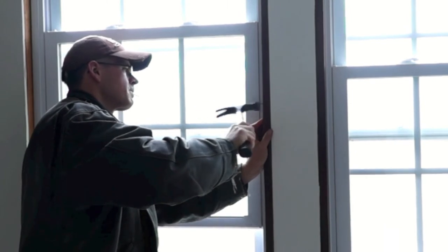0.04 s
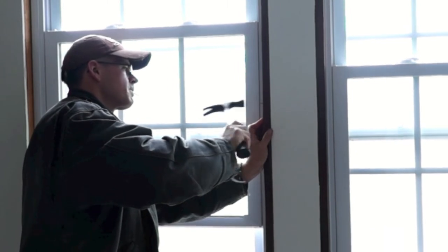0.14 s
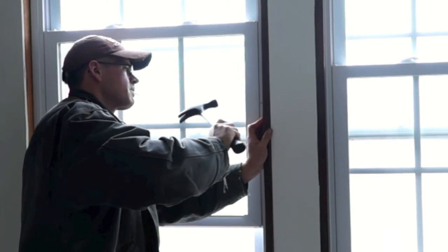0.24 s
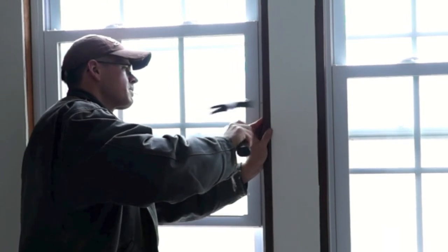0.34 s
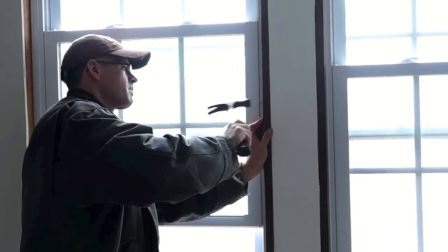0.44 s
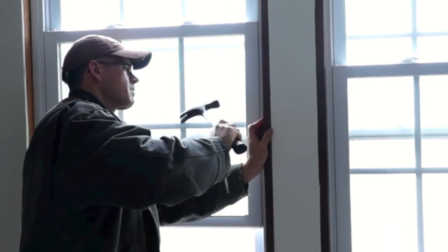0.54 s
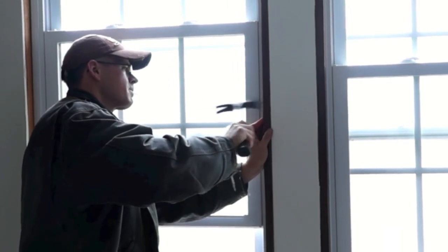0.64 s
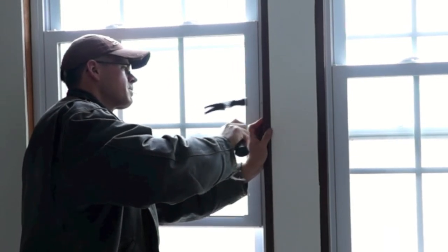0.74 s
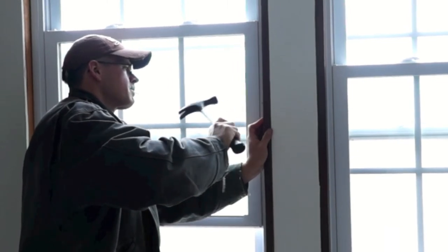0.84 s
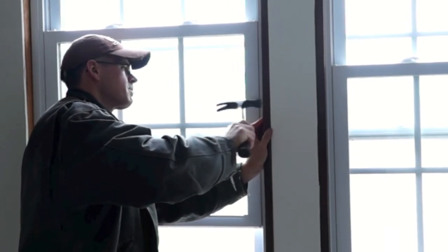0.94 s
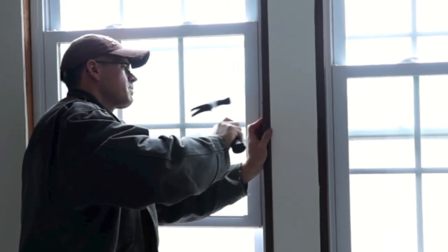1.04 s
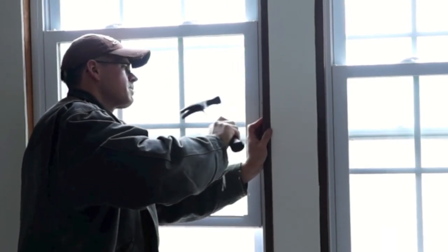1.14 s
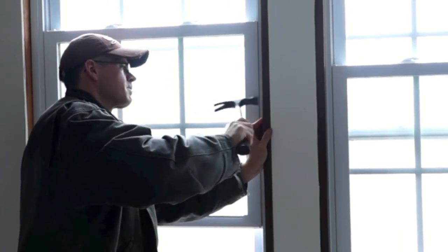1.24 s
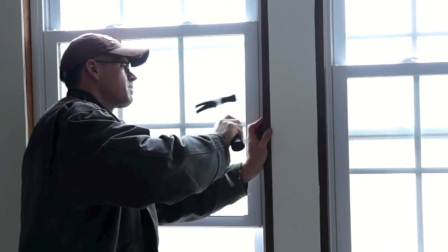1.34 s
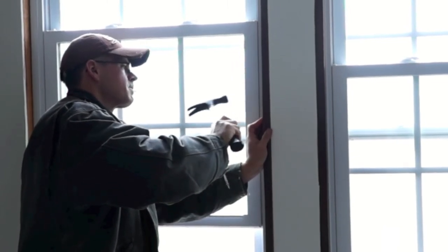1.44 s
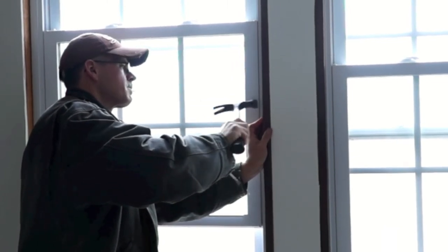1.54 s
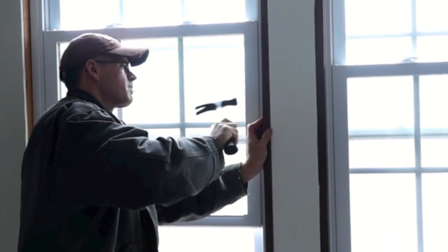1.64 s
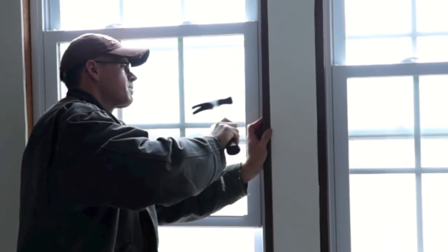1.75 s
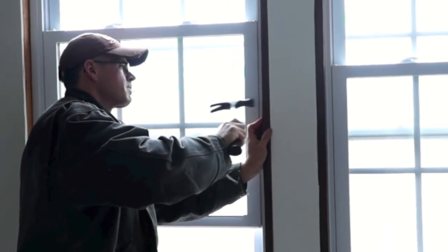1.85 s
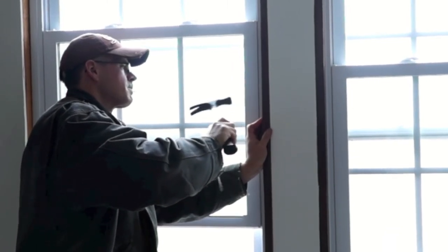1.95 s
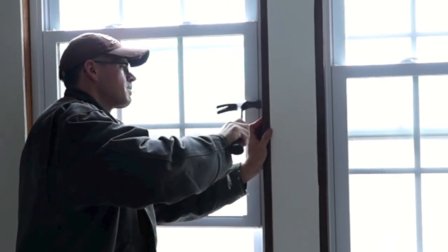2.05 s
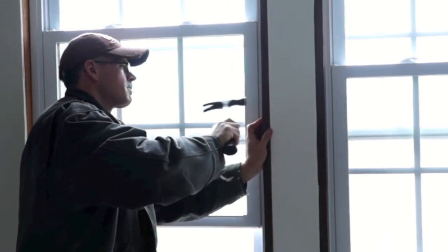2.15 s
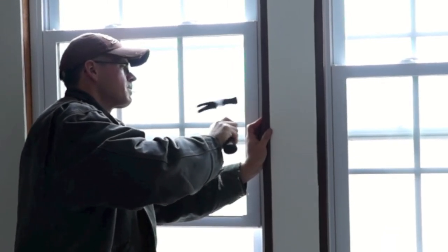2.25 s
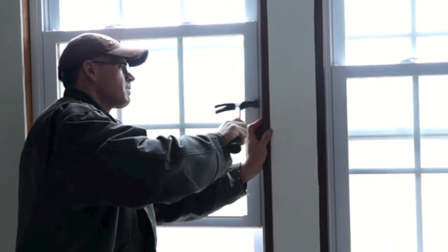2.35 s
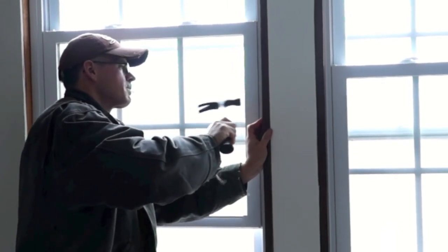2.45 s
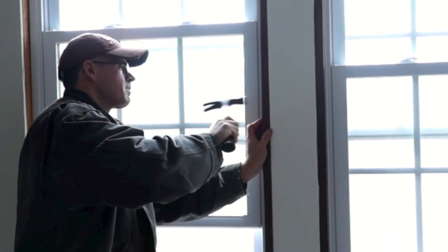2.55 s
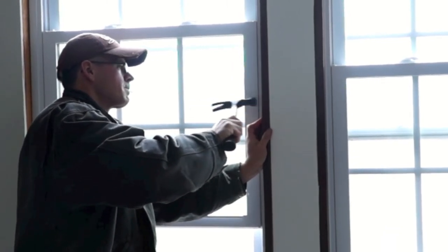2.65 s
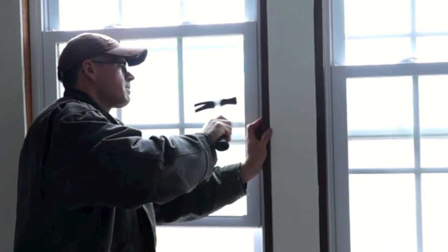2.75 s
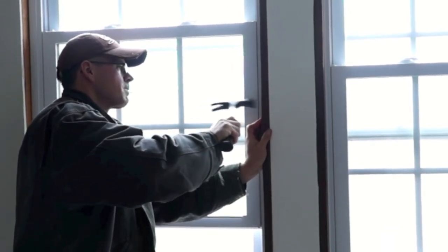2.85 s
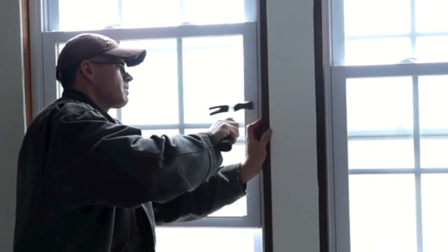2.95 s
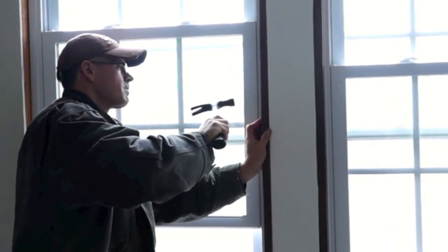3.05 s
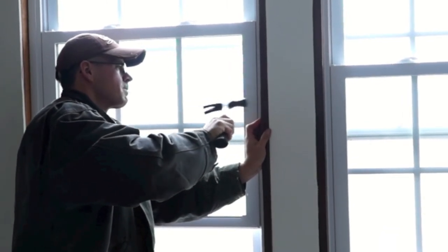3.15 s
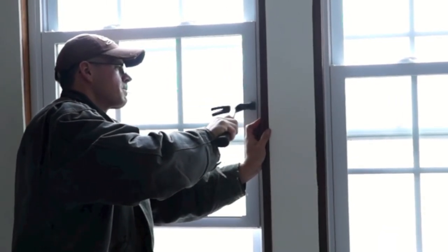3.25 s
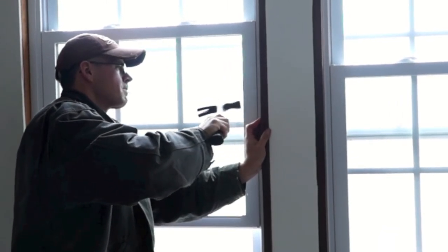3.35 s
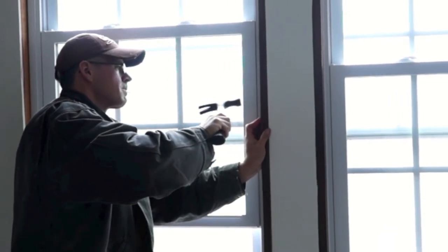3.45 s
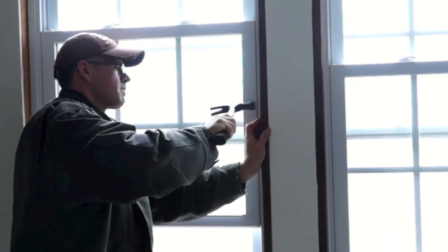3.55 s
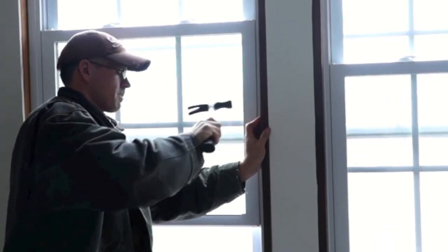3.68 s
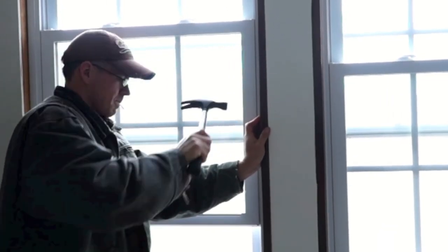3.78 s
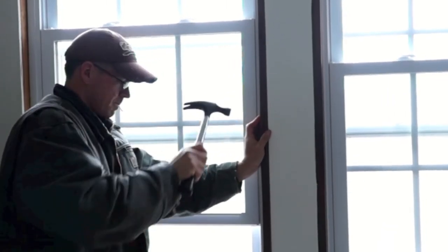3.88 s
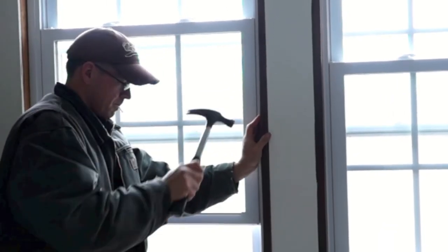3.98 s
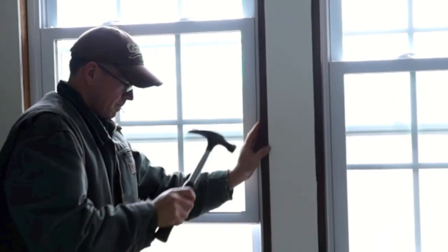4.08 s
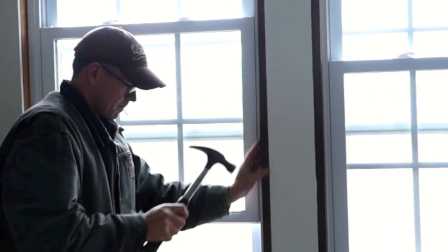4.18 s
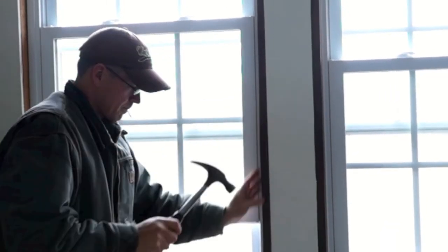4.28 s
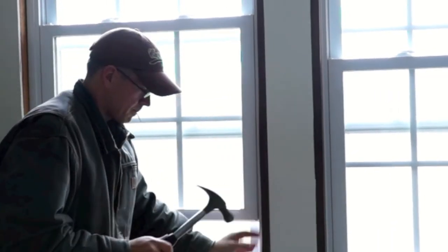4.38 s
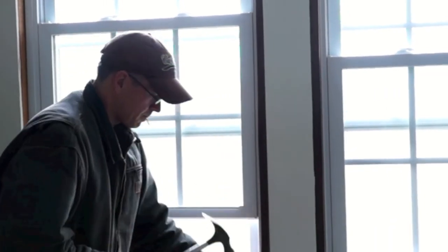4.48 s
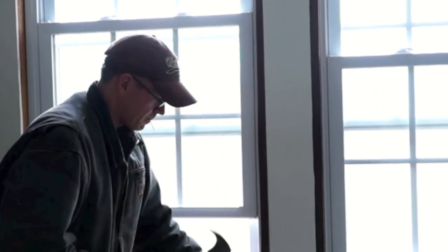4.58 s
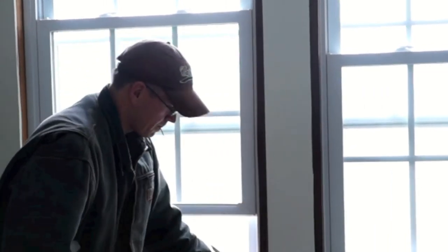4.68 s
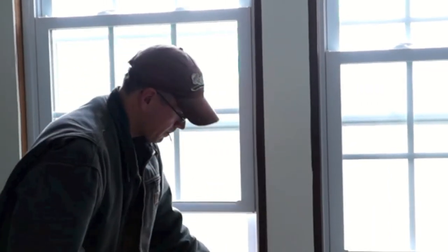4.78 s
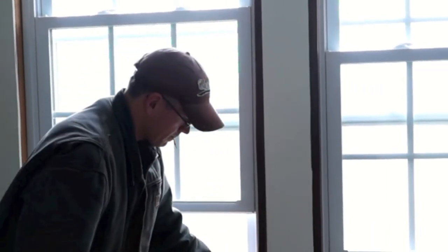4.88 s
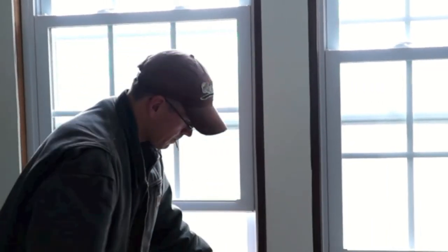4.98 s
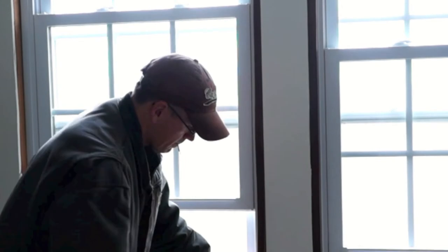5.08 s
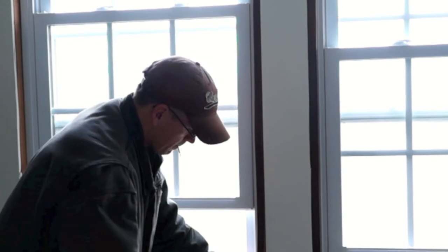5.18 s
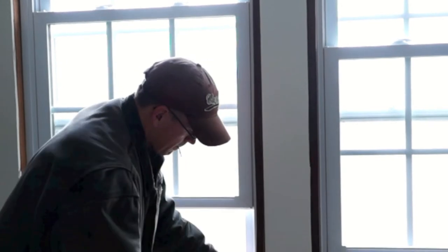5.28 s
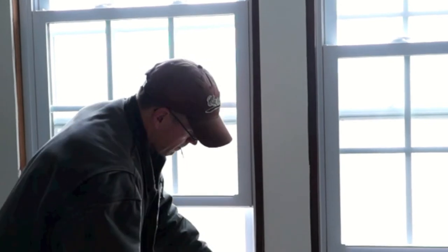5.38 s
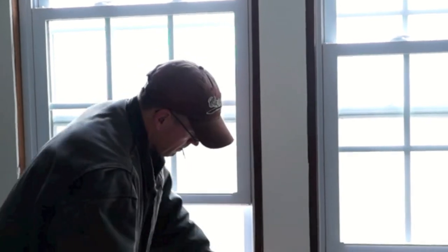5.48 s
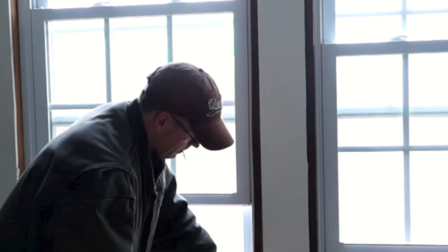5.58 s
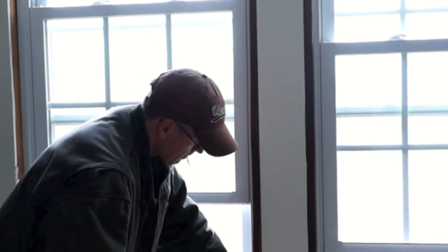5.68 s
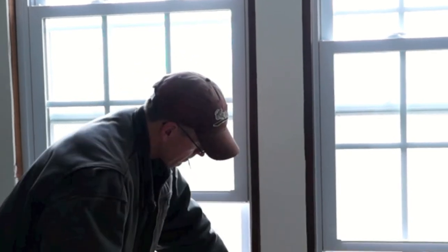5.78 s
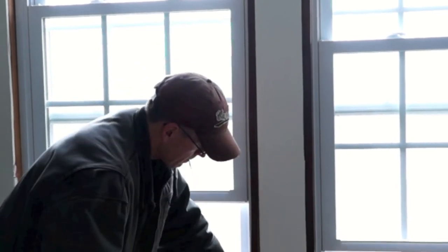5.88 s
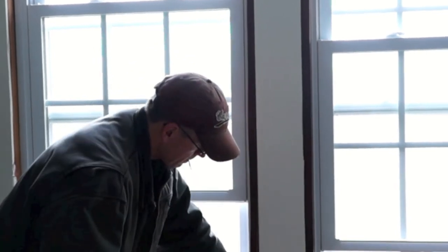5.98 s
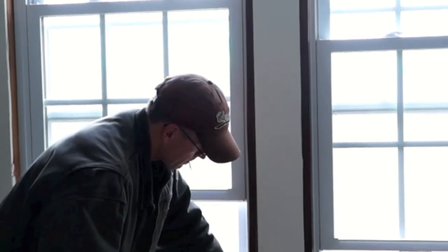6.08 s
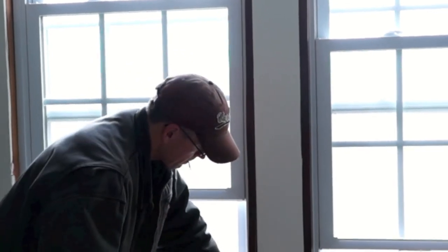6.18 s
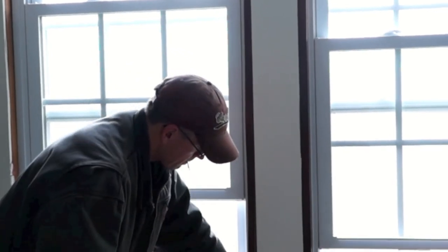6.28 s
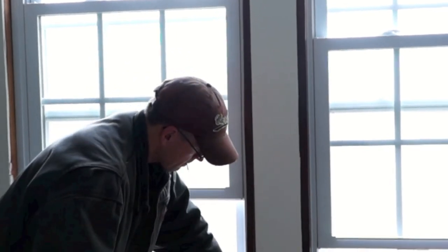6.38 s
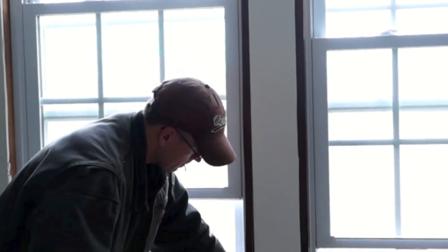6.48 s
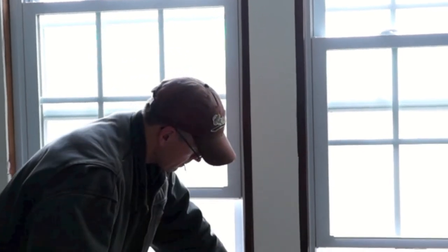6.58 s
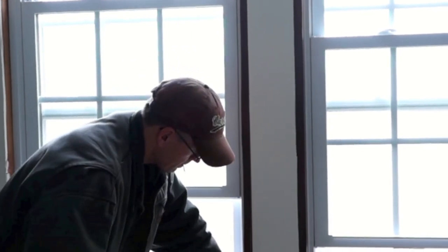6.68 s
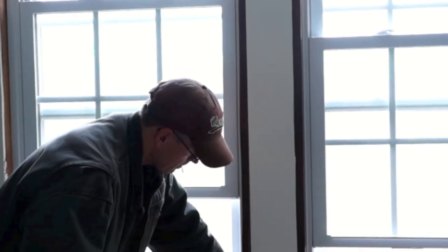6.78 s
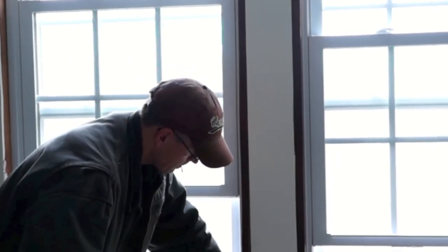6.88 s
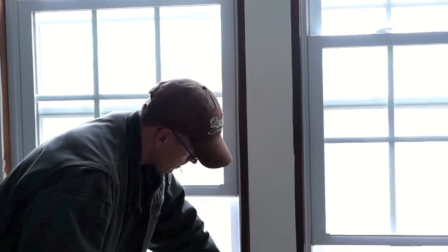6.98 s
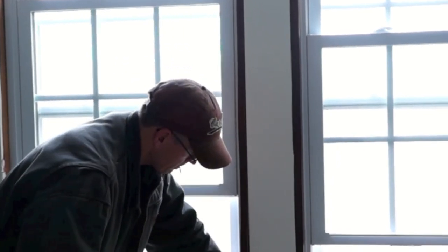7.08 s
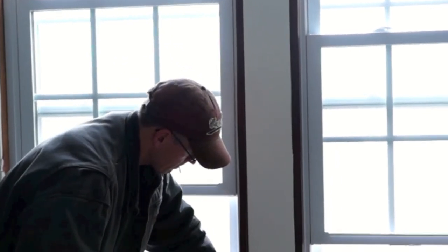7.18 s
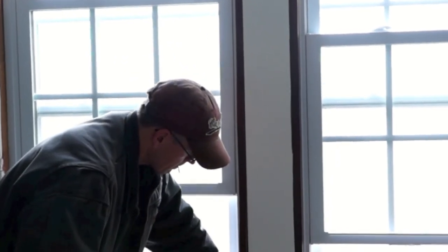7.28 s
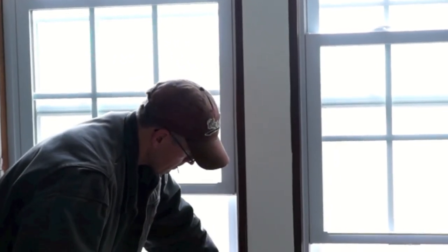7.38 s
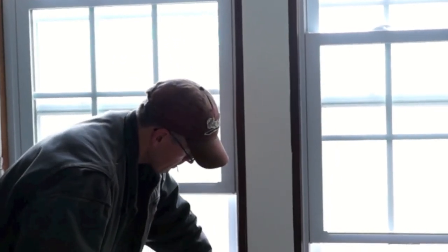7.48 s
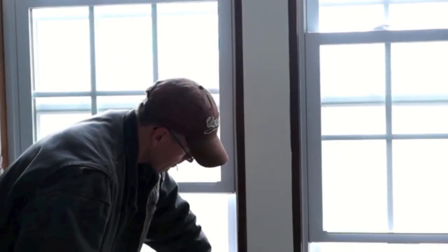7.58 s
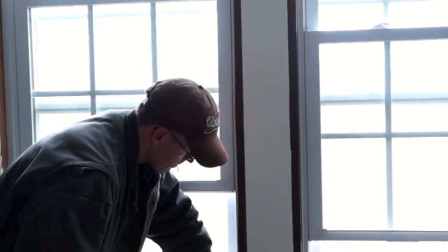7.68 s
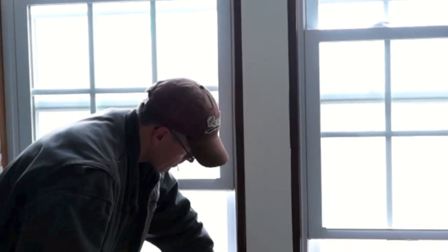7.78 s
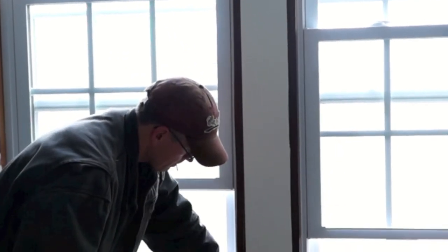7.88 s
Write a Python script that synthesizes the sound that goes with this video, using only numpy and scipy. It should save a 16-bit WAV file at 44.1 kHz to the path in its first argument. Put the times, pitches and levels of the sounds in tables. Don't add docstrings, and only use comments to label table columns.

```python
import sys
import numpy as np
from scipy import signal
from scipy.fft import rfft, irfft, next_fast_len
from scipy.io import wavfile
from scipy.ndimage import uniform_filter1d

SR = 44100
rng = np.random.default_rng(int(sys.argv[2]) if len(sys.argv) > 2 else 0)


def materialize(psi):
    bounded = np.clip(np.atleast_2d(psi).T, -1, 1)
    quanta = np.round(bounded * 32767).astype(np.int16)
    wavfile.write(sys.argv[1], SR, quanta)


def ratio_of_db(decibels):
    return 10 ** (np.asarray(decibels, float) / 20)


N = 349713
HZ = np.fft.rfftfreq(512, 1 / SR)

BLOW_S = [.0932, .4009, .6839, .9683, 1.2571, 1.5456, 1.8225, 2.0848, 2.3529, 2.6372, 2.911, 3.2463, 3.532]
# peak in dB, dB lost by a glancing face, then jamb, nail shank and trim in dB.
BLOWS = [(-18.5, 0, -18, -1, -5), (-18, -0.5, -17, -6.5, -7), (-18, -0.3, -13, -9, -10),
         (-17.5, -1.5, -13, -31, -9), (-17.5, -2, -10.5, -25, -1), (-17.5, -1.5, -11, -19, 5.5),
         (-18, -1, -10, -19.5, 5.5), (-18, -1.5, -12, -30, 5), (-18, -2, -9.5, -26, 5.5),
         (-17.5, -2.5, -5.5, -24, 0.5), (-17, -6, -2.5, -8, -8.5), (-19.5, -14, -0.5, -27, 2.5),
         (-17, -3, -3.5, -7, -3)]


def evened(x):
    return x / np.sqrt(np.mean(x ** 2) + 1e-20)


def read(points, hz):
    f, value = np.transpose(points)
    return np.interp(np.log(hz + 1), np.log(f + 1), value)


def above(x, hz):
    return signal.sosfilt(signal.butter(2, hz, "high", fs=SR, output="sos"), x)


def add(mix, s, sound):
    at = round(s * SR)
    part = mix[..., max(at, 0):max(at + sound.shape[-1], 0)]
    part += sound[..., max(-at, 0):][..., :part.shape[-1]]


def pulse(spectrum, size=4096):
    hz = abs(np.fft.fftfreq(size, 1 / SR))
    log = np.log(ratio_of_db(np.maximum(read(spectrum, hz), -90)))
    h = np.fft.ifft(np.exp(log - 1j * signal.hilbert(log).imag)).real[:size // 2]
    return h / np.linalg.norm(h)


def ring(modes, rise_s, size=22050, chance=1, spread=0.025, longest_s=0.67):
    t, port = np.arange(size) / SR, np.array([[1], [-1]])
    x = 0
    for k, (hz, db, t60) in enumerate(modes):
        start, apart, lean = rng.uniform(-1.066, 1, 3)
        turns = hz * t + chance * start + spread * apart * port
        level_db = db - 60 * t / min(t60, longest_s) + 15 * spread * lean * port
        x = x + (-1) ** k * ratio_of_db(level_db) * np.sin(2 * np.pi * turns)
    x = x * (1 - np.exp(-t / rise_s)) ** 2
    return x / abs(x).max()


def noise(gain, same, size, patchy_db):
    a, b, c, d, patches = rng.standard_normal((size // 128 + 5, 257, 5), dtype=np.float32).T
    patches = evened(uniform_filter1d(uniform_filter1d(patches, 12, axis=0), 14, axis=1))
    like = np.clip(read(same, HZ), -1, 1)[:, None]
    left = a + 1j * b
    right = like * left + np.sqrt(1 - like ** 2) * (c + 1j * d)
    z = np.array([left, right]) * gain * ratio_of_db(patchy_db * patches)
    return signal.istft(z, nperseg=512, noverlap=384)[1][:, :size] / np.sqrt(342)


def tightness(s):
    # time in seconds, how far the nail is seated (0-1).
    seating = [(.1, 0.18), (1.26, 0.3), (1.55, 0.74), (2.1, 0.98), (3.6, 0.97)]
    return np.clip(np.interp(s, *np.transpose(seating)), 0, 1)


def all_blows():
    times = [BLOW_S[0] - .29, *BLOW_S]
    return [(s, row[0], row[1]) for s, row in zip(times, BLOWS[:1] + BLOWS)]


def hammer():
    # pitch in Hz, level in dB per Hz.
    proud_knock = [(82, -54), (140, -13.5), (173, -8.5), (247, -8), (279, -2.5), (436, -19), (680, -6),
                   (1170, -20.5), (1520, -21), (1730, -14), (2750, -20.5), (5000, -34), (6500, -59),
                   (11000, -120)]
    # pitch in Hz, level in dB per Hz.
    gripped_knock = [(80, -32), (140, -15), (283, -0.5), (420, -2), (620, -10), (760, -6), (930, -6.5),
                     (1080, -13), (1340, -9.5), (1500, -15.5), (1800, -11), (2500, -18.5), (3300, -21.5),
                     (5000, -31), (9000, -58.5)]
    # pitch in Hz, level in dB per Hz.
    proud_tick = [(2120, -25), (3500, -9), (3900, -3.5), (7300, -2.5), (7880, 1.5), (12900, -8.5),
                  (16100, -15), (16500, -38)]
    # pitch in Hz, level in dB per Hz.
    flush_tick = [(2120, -39), (3500, -17.5), (3900, -3), (5620, 0), (8780, -0.5), (14300, -12),
                  (15700, -31), (16500, -69.5)]
    # delay in seconds, level in dB.
    spike_echoes = [(0, 0), (.0011, -5), (.0032, -5), (.0196, -9), (.0206, -6)]
    proud_knock, gripped_knock = pulse(proud_knock), pulse(gripped_knock)
    proud_tick, flush_tick = pulse(proud_tick), pulse(flush_tick)
    u = (np.arange(61) - 30) / SR / 0.00015
    spike = (0.77 * u ** 2 - 1) * np.exp(-u ** 2 / 2)
    chatter_fade = np.exp(-np.arange(600) / SR / 0.0043)
    steel, wood, body = np.zeros(N), np.zeros(N), np.zeros((2, N))
    for s, db, miss_db in all_blows():
        seat = tightness(s)
        tick_db = db - 10 + miss_db
        tick = (1 - seat ** 4) * proud_tick + seat ** 4 * flush_tick
        add(steel, s, ratio_of_db(tick_db + 17.0) * tick)
        chatter = rng.standard_normal(600) * chatter_fade
        shiver = signal.oaconvolve(chatter / np.linalg.norm(chatter), tick)
        add(body, s, ratio_of_db(tick_db + 29.5) * shiver)
        push = -ratio_of_db(db + 12.5) * ((1 - seat) * proud_knock + seat * gripped_knock)
        add(wood, s + 0.001618, push)
        add(body, s + .0014, 2.2 * above(push, 380))
        for late_s, echo_db in spike_echoes:
            add(body, s + late_s + .0015 - 30 / SR, ratio_of_db(db + 8 + echo_db) * spike)
    return steel, wood, body


def trim_and_wall():
    # pitch in Hz, level in dB, seconds to fade by 60 dB.
    loose_trim = [(577, -25, 0.059), (633, -11, 0.41), (693, -7.5, 0.34), (783, -15, 0.075),
                  (814, -8.5, 0.32), (834, -12, 0.23), (1072, -20, 0.36), (1348, -10.5, 0.26)]
    # pitch in Hz, level in dB, seconds to fade by 60 dB.
    tight_trim = [(334, -8.5, 0.15), (633, 11, 0.49), (826, -9, 0.4), (880, -6.5, 0.14), (1013, 11.5, 0.27),
                  (1344, 6, 0.35), (536, -0.5, 0.25), (707, -6, 0.21), (1805, -5, 0.31), (383.5, 8.5, 0.21),
                  (470, -4, 0.084)]
    # pitch in Hz, level in dB, seconds to fade by 60 dB.
    pane = [(666.5, -1, 0.76), (662, -6.5, 0.72)]
    # pitch in Hz, level in dB, seconds to fade by 60 dB.
    boom = [(91.5, 13.5, 0.22), (101.1, 0, 0.35), (59, -12, 0.44), (125.1, -7.5, 0.45)]
    # pitch in Hz, level in dB, seconds to fade by 60 dB.
    thump = [(276.5, 1, 0.16), (282.3, 0.5, 0.2), (191, 7.5, 0.064), (238.4, -10, 0.42), (462, -13, 0.15)]
    # pitch in Hz, level in dB, seconds to fade by 60 dB.
    board = [(1687, -1, 0.15), (1935, 5.5, 0.065), (2400, 0.5, 0.031), (2567, 4, 0.04), (3390, -5.5, .05),
             (1841, -4.5, 0.056)]
    # pitch in Hz, level in dB, seconds to fade by 60 dB.
    grip = [(610, 17.5, 0.017), (467, 7.5, .02), (917, 23, 0.033), (1034, -1, 0.14)]
    loose_trim = ring(loose_trim, rise_s=0.021, longest_s=0.53)
    tight_trim = ring(tight_trim, rise_s=0.019, longest_s=0.18)
    pane = ring(pane, rise_s=0.069)
    boom = ring(boom, rise_s=0.06, chance=0, spread=0.042)
    thump = ring(thump, rise_s=0.008, chance=0)
    board = ring(board, rise_s=0.00069, chance=0)
    grip = ring(grip, rise_s=0.00017)
    body = np.zeros((2, N))
    for s, db, miss_db in all_blows():
        seat = tightness(s)
        boom_db = -11 - 0.8 * s + 0.47 * miss_db
        thump_db = -5.5 + 6 * seat + 0.88 * miss_db
        add(body, s + 0.00071, ratio_of_db(db + 1.0 - 0.195 * miss_db) * board)
        add(body, s + 0.00071, ratio_of_db(db + 4.5) * (0.414 + 1.06 * seat) * grip)
        add(body, s, ratio_of_db(db - 7.5) * ((1 - seat) * loose_trim + seat * tight_trim))
        add(body, s, ratio_of_db(db - 33) * (1 - 0.36 * seat) * pane)
        add(body, s + 0.00812, ratio_of_db(db + thump_db - 8.5) * thump)
        add(body, s + 0.013, ratio_of_db(db + boom_db + 3.0) * boom)
    return body


def jamb():
    # pitch in Hz, level in dB, seconds to fade by 60 dB.
    jamb_modes = [(479.4, 4, 0.15), (529.5, 3, 0.22), (614, 2, 0.28), (660, -5.5, 0.18), (779, -11, 0.12),
                  (786, -9.5, 0.21), (941, -3, 0.13)]
    # pitch in Hz, level in dB, seconds to fade by 60 dB.
    shank = [(3420, -2.5, .07), (2286, -4.5, 0.033), (2670, -3.5, 0.023)]
    # pitch in Hz, level in dB, seconds to fade by 60 dB.
    hollow = [(622, 1.5, 0.32), (692, -3, 0.38), (540, -5, 0.37), (447, -1, 0.35)]
    # pitch in Hz, level in dB, seconds to fade by 60 dB.
    buzz = [(2180, 0, 0.25), (2360, 0, .28), (2450, -2, .3), (2650, -5.5, 0.24), (2810, -5, 0.3),
            (3340, -2, .25), (3470, -3.5, .25)]
    # pitch in Hz, level in dB, seconds to fade by 60 dB.
    strip = [(850, 2, 0.3), (869, 1.5, 0.41), (920, -6.5, 0.13), (1002, 1.5, 0.27), (764, -5, 0.13),
             (1150, -9, 0.08)]
    out = np.zeros((2, N))
    for s, (db, _, jamb_db, shank_db, trim_db) in zip(BLOW_S, BLOWS):
        jamb_ring = ring(jamb_modes, rise_s=0.0015, size=9000, chance=0.59, spread=0.041)
        add(out, s + 0.001125, ratio_of_db(db + jamb_db) * jamb_ring)
        shank_ring = ring(shank, rise_s=0.0011, size=4000, chance=0.21, spread=.05)
        add(out, s + .001, ratio_of_db(db + shank_db) * shank_ring)
        hollow_ring = ring(hollow, rise_s=0.017, size=12000, spread=0.076)
        add(out, s + 0.00507, ratio_of_db(db + jamb_db - 7.5) * hollow_ring)
        add(out, s + .01, ratio_of_db(db - 22) * ring(buzz, rise_s=0.014, size=10000, spread=.1))
        strip_db = trim_db - 21 + 10 * tightness(s)
        strip_ring = ring(strip, rise_s=0.015, size=10000, chance=0.42, spread=.05, longest_s=0.25)
        add(out, s + 0.00406, ratio_of_db(db + strip_db) * strip_ring)
    return out


def taps():
    # start in seconds, peak in dB, floor thud in dB, scuff in dB.
    tap_rows = [
        (3.872, -63, -75, -7),
        (4.34, -75, -77, -7),
        (5.788, -43.5, -52.5, -5),
        (6.043, -43.5, -52.5, -9),
        (6.321, -43, -52.5, -9),
        (6.568, -46.5, -50.5, -2.5),
        (6.819, -44.5, -49.5, -2.5),
        (7.06, -37.5, -45.5, -8),
        (7.328, -39, -47, -9),
        (7.896, -36, -49, 0.5),
    ]
    # pitch in Hz, level in dB per Hz.
    dull_knock = [(120, 0.5), (200, 4.5), (450, -14), (542, -6), (670, -14), (1410, -18.5), (3120, -27.5),
                  (6000, -80), (7800, -79), (13200, -120)]
    # pitch in Hz, level in dB, seconds to fade by 60 dB.
    joists = [(27.55, 4.5, 0.89), (35.4, 2, 0.94), (44.6, -3, 0.82), (55.9, 18.5, 0.27), (64.1, 7, 0.17)]
    # pitch in Hz, level in dB, seconds to fade by 60 dB.
    frame = [(89.4, -3, 0.71), (112, 6.5, 0.28), (125.7, 0, 0.27), (184, -16, 0.081), (229, -6, 0.19),
             (290.8, 0, 0.19), (361, -13.5, 0.38)]
    # pitch in Hz, level in dB, seconds to fade by 60 dB.
    glass = [(545, 14, 0.43), (1280, -30, 0.24)]
    knock, t = pulse(dull_knock), np.arange(6000) / SR
    scuff_shape = np.exp(-t / 0.062) * (1 - np.exp(-t / 0.0016))
    air, body = np.zeros(N), np.zeros((2, N))
    for s, db, thud_db, scuff_db in tap_rows:
        add(air, s, ratio_of_db(db + 13.5) * knock)
        scuff = rng.standard_normal((2, 6000)) * scuff_shape
        scuff = scuff + 0.97 * scuff[::-1]
        add(body, s, ratio_of_db(db + scuff_db) * signal.oaconvolve(scuff, knock[None], axes=1))
        thud = ring(joists, rise_s=0.018, chance=0.38, spread=0.0056, longest_s=0.91)
        add(body, s, ratio_of_db(thud_db + 12.5) * thud)
        hum = ring(frame, rise_s=0.017, chance=0.2, spread=0.009, longest_s=0.51)
        add(body, s, ratio_of_db(db + 5) * hum)
        add(body, s, ratio_of_db(db - 20.5) * ring(glass, rise_s=0.032, size=13000))
    return air, body


def clicks():
    # start in seconds, peak in dB, snap in dB, snap pitch in Hz.
    click_rows = [(3.8727, -55, -16, 7050), (3.8866, -51.5, -17, 5100), (4.3261, -64.5, 6, 744),
                  (4.4558, -64, -5, 885), (5.7917, -34, -19.5, 6940), (6.046, -58, 1.5, 880),
                  (6.3216, -45.5, -24, 3180), (6.352, -56, -8, 6970), (6.3658, -33.5, -18.5, 6950),
                  (6.6004, -43.5, -14.5, 6760), (6.8188, -54, -9, 1700), (6.8443, -43.5, -15, 7040),
                  (7.0654, -54, -2, 1750), (7.0856, -38, -17, 6600), (7.3297, -46.5, -14, 2190),
                  (7.3528, -40.5, -14.5, 4900), (7.9214, -44.5, -7, 6940)]
    # start in seconds, peak in dB, snap in dB, snap pitch in Hz.
    scrape_rows = [
        (5.29, -49, -10.5, 5660),
        (5.799, -33, -22, 5430),
        (7.056, -34.5, -14, 7800),
        (7.124, -41.5, -14, 6100),
        (7.155, -37, -16, 4130),
        (7.445, -57.5, 9.5, 593),
        (7.424, -38.5, -12.5, 4610),
        (7.898, -42.5, -5.5, 5030),
    ]
    # factor on the snap pitch, level in dB.
    snap_colour = [(.3, -51), (.7, -13.5), (1, -6), (1.4, -13), (2.2, -22), (4, -47)]
    t = np.arange(4000) / SR
    ping = np.sin(2 * np.pi * 1280 * t[:400]) * np.exp(-t[:400] / 0.00019) / 2
    click = ratio_of_db(-12.5 - 60 * t / 0.063)
    scrape = ratio_of_db(-1.5 - 60 * t / 0.053) * (1 - np.exp(-t / 0.0038))
    contact = 0.41 * np.exp(-t / .002) * (1 - np.exp(-t / 0.0002))
    air = np.zeros(N)
    for rows, shape, lead in ((click_rows, click, contact), (scrape_rows, scrape, 0)):
        for s, db, snap_db, snap_hz in rows:
            hit = rng.random(4000) < 2200 / SR
            grains = rng.standard_normal(4000) * (shape * hit + lead)
            snap = pulse([(k * snap_hz, level_db) for k, level_db in snap_colour], size=800)
            add(air, s, ratio_of_db(db - 3) * np.convolve(grains, ping + ratio_of_db(snap_db + 8.5) * snap))
    return air


def short_notes(rows):
    out = np.zeros((2, N))
    for s, db, hz, t60 in rows:
        add(out, s, ratio_of_db(db) * ring([(hz, 0, t60)], rise_s=0.00073, size=6000))
    return out


def sill():
    # start in seconds, level in dB.
    set_down = [
        (4.324, -63),
        (4.457, -56),
    ]
    # pitch in Hz, level in dB, seconds to fade by 60 dB.
    sill_modes = [(251.4, -3, 0.5), (289, 3.5, 0.22), (243, 0, 0.41)]
    out = np.zeros((2, N))
    for s, db in set_down:
        add(out, s, ratio_of_db(db) * ring(sill_modes, rise_s=0.0018))
    return out


def cloth_and_hiss():
    # loudest moment in seconds, level in dB, pitch in Hz, fine weave in dB.
    rustles = [(3.89, -65, 650, -68), (4.07, -64, 1150, -83), (4.195, -60.5, 850, -79),
               (4.286, -59, 990, -64), (4.329, -64, 760, -73), (4.38, -65, 900, -63.5),
               (4.462, -71, 900, -82), (4.625, -66, 1200, -72), (5.03, -68, 1110, -70),
               (5.15, -71, 3200, -66), (5.21, -62, 1090, -77), (5.29, -58.5, 1720, -63.5),
               (5.31, -77, 2500, -71), (5.43, -70, 850, -79), (5.57, -67, 740, -79)]
    # time in seconds, level in dB.
    brush = [
        (3.8, -88),
        (4.2, -71),
        (4.5, -85),
        (4.95, -79),
        (5.1, -70),
        (5.65, -73),
        (5.8, -77.5),
        (6.5, -69.5),
        (7.93, -72),
    ]
    # factor on the fold pitch, level in dB.
    fold_colour = [(.15, -20), (.6, 0), (1, -2), (1.35, 1), (2.5, -30), (8, -62.5)]
    # pitch in Hz, level in dB per Hz.
    weave_colour = [(1500, 5.5), (4000, -2), (10000, 0), (13000, -6), (16000, -27)]
    # pitch in Hz, level in dB per Hz.
    creak_colour = [(20, -4), (60, 0), (110, -21), (250, 8), (400, -25), (800, -48)]
    # pitch in Hz, level in dB per Hz.
    hiss_colour = [(12, -30.5), (20, -1), (44, -22.5), (104, -3), (325, -1), (653, -6.5), (772, -3),
                   (3030, -15), (3800, -18), (7190, -16), (15700, -21)]
    # pitch in Hz, left-right likeness (-1 to 1).
    hiss_same = [(60, 0.54), (240, 0.27), (950, -0.49), (3770, -0.081), (15000, 0.46)]

    def unit(gain):
        return gain ** 2 / np.mean(gain ** 2, axis=0)

    t = np.arange(N // 128 + 5) * 128 / SR
    factor, shape_db = np.transpose(fold_colour)
    weave = unit(ratio_of_db(read(weave_colour, HZ)))[:, None]
    creak = unit(ratio_of_db(read(creak_colour, HZ)))[:, None]
    power = weave * ratio_of_db(np.interp(t, *np.transpose(brush), -120) + 9.5) ** 2
    for s, db, hz, weave_db in rustles:
        fold = unit(ratio_of_db(np.interp(np.log((HZ[:, None] + 1) / hz), np.log(factor), shape_db)))
        crest = ratio_of_db(np.minimum(600 * (t - s), 245 * (s - t))) ** 2
        crease = fold * ratio_of_db(db + 6.5) ** 2 + weave * ratio_of_db(weave_db + 7.5) ** 2 + creak * ratio_of_db(db - 7) ** 2
        power = power + crest * crease
    hiss = unit(ratio_of_db(read(hiss_colour, HZ)))[:, None] * ratio_of_db(-60 + 0.5) ** 2
    hiss = hiss * (HZ[:, None] < 15800)
    return noise(np.sqrt(power + hiss), hiss_same, N, patchy_db=0.9)


def room(wet_db, build_s):
    # delay in seconds, level in dB.
    echoes = [(.0032, -13), (.005, -11), (.017, -14), (.0205, -12)]
    # pitch in Hz, seconds to fade by 60 dB.
    fade_s = [(60, 0.54), (160, 0.32), (420, 0.3), (1100, 0.31), (2900, 0.25), (6000, 0.26), (10000, 0.23),
              (15000, 0.21)]
    # pitch in Hz, left-right likeness (-1 to 1).
    same = [(60, 0.65), (180, 0.99), (550, 0.55), (1650, 0.65), (4970, 0.39), (15000, 0.044)]
    # pitch in Hz, left minus right in dB.
    lean = [(60, -4), (180, -2.5), (550, 0), (1650, 1.5), (4970, -1), (15000, 1)]
    size = SR // 2
    hz, t, z = signal.stft(noise(1, same, size, patchy_db=-1.0), SR, nperseg=256)
    local_power = uniform_filter1d(uniform_filter1d(abs(z) ** 2, size=5, axis=1), size=7, axis=2)
    z = z / np.sqrt(local_power)
    side = np.array([.5, -.5])[:, None, None]
    z = z * ratio_of_db(-60 * t / read(fade_s, hz)[:, None] + side * read(lean, hz)[:, None])
    z = z * (1 - np.exp(-t * (hz[:, None] + 20) / 4.0))
    z = z * (hz[:, None] < 15160)
    tail = signal.istft(z, SR, nperseg=256)[1][:, :size]
    tail = tail * (1 - np.exp(-np.arange(size) / SR / build_s))
    out = ratio_of_db(wet_db) * tail / np.linalg.norm(tail[0])
    out[:, 0] += .6
    for s, db in echoes:
        out[:, round(s * SR)] += ratio_of_db(db + rng.uniform(-2, 2, 2)) * rng.choice([-1, 1])
    return out


def ports(x):
    # pitch in Hz, radians the left microphone leads.
    port_turn = [(40, -.2), (90, -0.26), (340, -0.49), (900, -0.2), (2500, 0.23)]
    # pitch in Hz, left minus right in dB.
    port_lean = [(40, 1), (90, -2), (290, -1.5), (640, -1), (2000, 1.5), (4000, 3)]
    size = next_fast_len(N + 4096)
    hz, half = np.fft.rfftfreq(size, 1 / SR), np.array([[.5], [-.5]])
    shift = np.exp(1j * half * read(port_turn, hz))
    return irfft(rfft(x, size) * ratio_of_db(half * read(port_lean, hz)) * shift, size)[:, :N]


def scene():
    # start in seconds, level in dB, pitch in Hz, seconds to fade by 60 dB.
    sash_notes = [
        (6.372, -54, 1470, .05),
        (6.574, -60, 1730, .05),
        (6.819, -55, 1680, 0.065),
        (7.065, -43, 1630, 0.055),
        (7.088, -51, 1450, .05),
        (7.33, -59, 1700, 0.046),
    ]
    # start in seconds, level in dB, pitch in Hz, seconds to fade by 60 dB.
    nudges = [
        (4.457, -58, 900, .06),
        (4.62, -67, 1200, .12),
        (5.285, -67, 1700, .15),
        (5.3, -70, 2400, .1),
        (5.792, -54, 2100, .04),
        (6.05, -54, 900, .08),
        (7.066, -52, 2240, .05),
        (7.165, -52, 573, 0.22),
        (7.425, -49, 1006, 0.11),
        (7.43, -52, 571, .25),
    ]
    hammer_steel, hammer_wood, hammer_body = hammer()
    body = hammer_body + trim_and_wall() + jamb()
    tap_air, tap_body = taps()
    click = clicks()
    steel = hammer_steel + ratio_of_db(-1.5) * click
    wood = hammer_wood + tap_air
    mix = ports(body) + 4.9 * click + tap_body
    for source in (wood, steel):
        echo = room(wet_db=13.5, build_s=0.0055)
        mix = mix + signal.oaconvolve(source[None], echo, axes=1)[:, :N]
    return mix + sill() + short_notes(sash_notes) + short_notes(nudges) + cloth_and_hiss()


def top_cut(x):
    return signal.sosfilt(signal.butter(12, 16840, fs=SR, output="sos"), x)


def record(dry):
    power_db = 10 * np.log10(abs(uniform_filter1d((dry ** 2).mean(0), 130)) + 1e-12)
    fall = np.arange(N) * 1000.0 / SR
    held_db = np.maximum.accumulate(power_db + fall) - fall
    over_db = np.maximum(held_db + 19.5, 0)
    cut_db = 0.8 * uniform_filter1d(over_db, size=90, origin=40)
    return top_cut(above(dry / ratio_of_db(cut_db), 25))


dry = scene()
out = record(dry)
materialize(out)
```